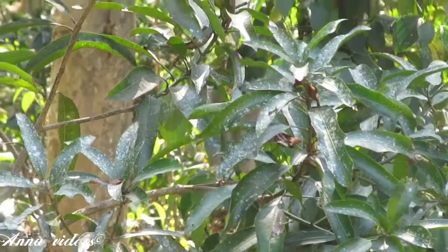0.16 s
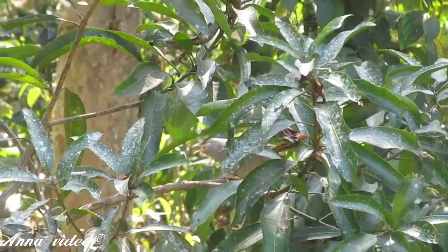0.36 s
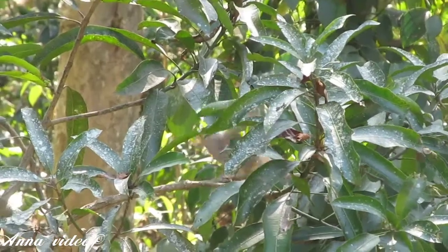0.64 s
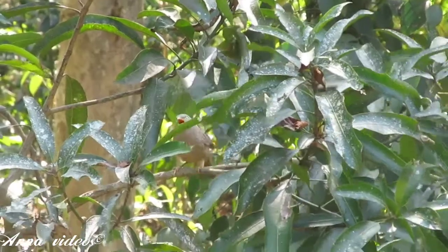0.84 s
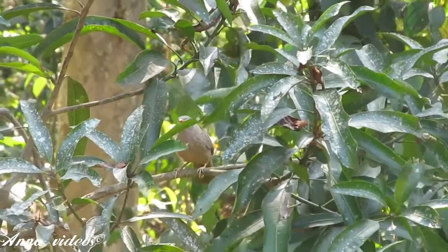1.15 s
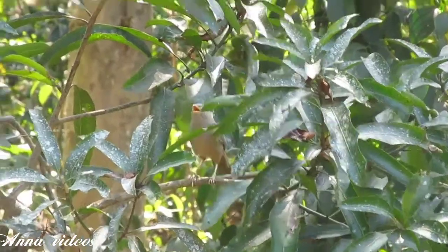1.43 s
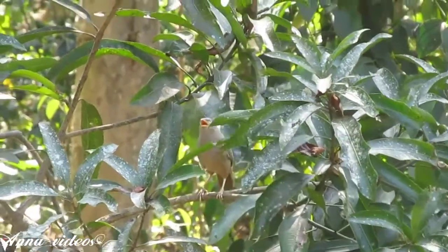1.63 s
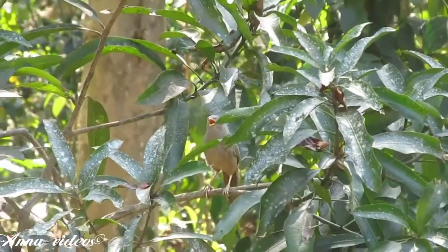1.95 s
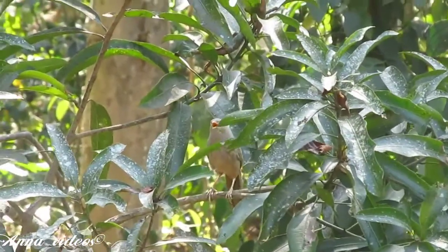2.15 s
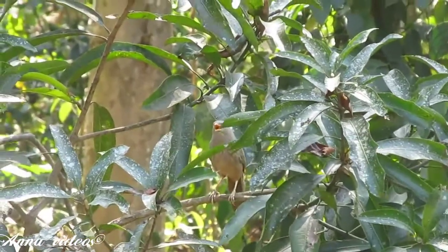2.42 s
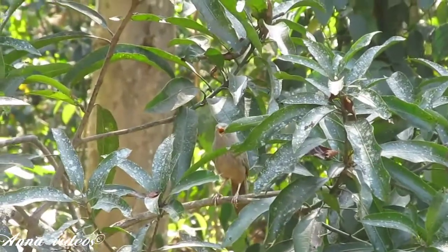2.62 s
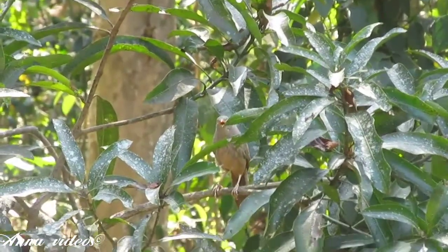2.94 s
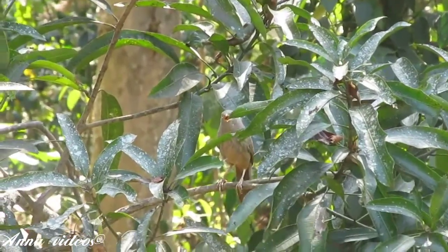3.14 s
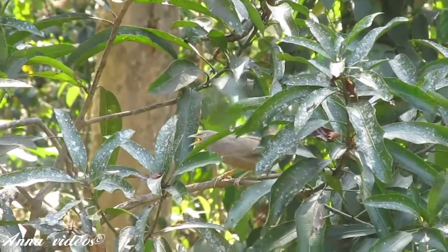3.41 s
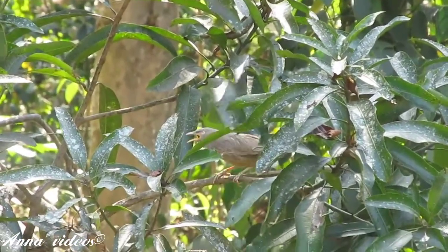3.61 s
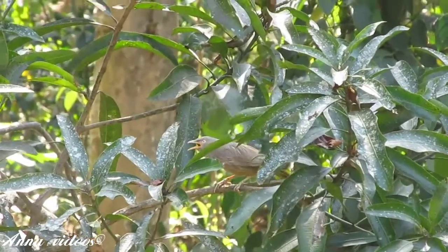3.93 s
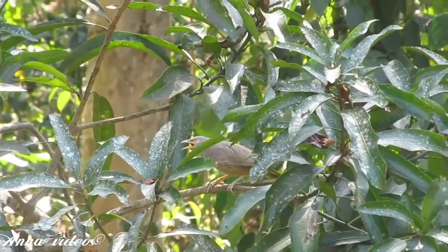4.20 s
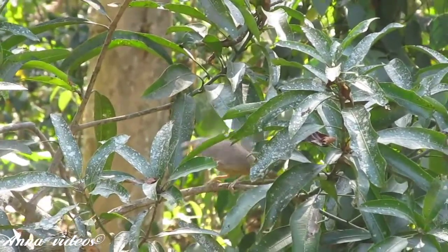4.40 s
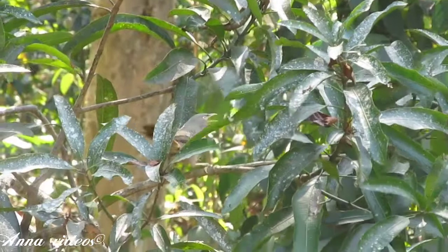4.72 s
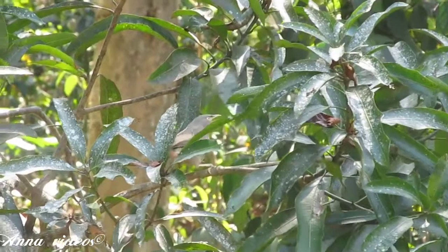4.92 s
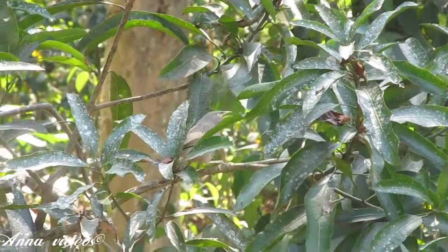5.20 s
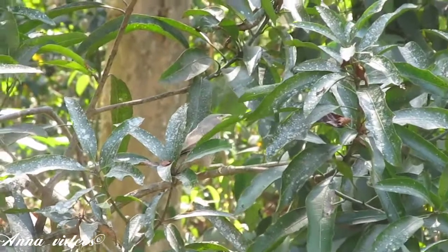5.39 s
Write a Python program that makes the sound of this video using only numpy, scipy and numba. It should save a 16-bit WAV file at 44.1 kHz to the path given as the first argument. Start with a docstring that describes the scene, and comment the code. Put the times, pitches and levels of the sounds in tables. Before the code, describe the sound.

Rapid ringing bird notes break into rasping chatter, squeaks and throbbing churrs among leafy trees, with distant traffic and a faint far crow at the end.

```python
"""Babbler in garden trees

Ringing notes swoop up, hold and break into a dying rasp, among short squeaks, throbbing churrs and harsh chatter.
Stacked partials make the voiced calls; uneven slaps ringing throat and beak cavities make the harsh ones.
Leaves and walls echo the bird and a far hoarse crow, over leaf hiss, traffic rumble and faint machine tones.
The camera changes its sample rate crudely, so every tone gets ghost tones around it."""
import sys
import numpy as np
from scipy import signal
from scipy.fft import rfft, irfft
from scipy.io import wavfile
from scipy.ndimage import uniform_filter1d
from numba import njit

SR = 44100
rng = np.random.default_rng(int(sys.argv[2]) if len(sys.argv) > 2 else 0)


def put_to_file(sound):
    """Save the sound as 16-bit audio at rate SR, in the file named by the first command-line argument."""
    columns = np.atleast_2d(sound).T  # one column per channel
    safe = np.clip(columns, -1, 1)
    whole_steps = np.round(safe * 32767)
    wavfile.write(sys.argv[1], SR, whole_steps.astype(np.int16))


def volts_from_decibels(level):
    """Turn decibel levels (scalar or array-like) into linear amplitude factors."""
    exponent = np.asarray(level, float) / 20
    return 10 ** exponent


N = 244755
T = np.arange(N) / SR

# Call levels below stand ahead of the bird's overall trim and the echoes.
# ringing notes: (start [s], length [s], aimed pitch [Hz], swoop time [s], sag by the end [Hz],
#                 held second partial [dB], first partial against it [dB])
NOTES = [(0.286, 0.12, 2489, .015, 219, -15.5, -1), (0.502, .043, 2120, .016, 410, -24.5, -5),
         (0.634, .134, 2323, .016, 80.4, -15.5, -1.5), (0.846, .073, 2341, 0.0097, 190, -12, -4.5),
         (1.334, .081, 2248, .007, 130, -13.5, -3.5), (3.445, .059, 2314, .014, 10.1, -10, -9),
         (3.612, .075, 2230, .020, 110, -16, -2.5), (3.778, .074, 2382, .018, 189, -12.5, -5.5),
         (4.517, 0.098, 2390, .011, 114, -12.5, -5), (4.698, .049, 2330, .011, 198, -20, 3.5)]
# flutter of each note's second partial, which also scales its pitch waver and breath: (flutter [dB])
NOTE_FLUTTER = [3.2, 2.5, 1, 1.3, 1.4, 2, 1.9, 1.3, 1.6, 2.2]
# brightness of each note, on its breath and its partials from the fourth up: (lift [dB])
NOTE_BRIGHTNESS = [-17, -6, -13, -1.5, 0, -12, -7, -11, -13, -4]
# growth of each note from start to end: (growth [dB])
NOTE_GROWTH = [-3, -3, 6, -4.5, -1, 1.5, -5.5, -2, 2, -4]
# low short squeaks: (start [s], length [s], aimed pitch [Hz], held second partial [dB])
SQUEAKS = [(1.008, .022, 1380, -30.5), (4.173, .025, 1340, -35), (4.296, .027, 1452, -31.5),
           (4.422, .028, 1462, -29)]
# throbbing half-voiced churrs: (start [s], length [s], aimed pitch [Hz], sag by the end [Hz],
#                                held second partial [dB], growth from start to end [dB])
CHURRS = [(2.644, .108, 1580, 170, -22, -10), (3.39, .055, 1580, -240, -26, 3)]
# third partial against the second, by its own frequency: (frequency [Hz], level [dB])
THIRD_PARTIAL = [(4000, -8.5), (4700, -4.5), (5300, -1.5), (5700, -9), (6200, -19), (6900, -17.5),
                 (7400, -22)]
# airway response for upper partials and, at a reduced share, breath: (frequency [Hz], gain [dB])
AIRWAY = [(800, -19), (2000, 12), (4000, -14), (5600, 0), (6600, -8), (7200, -20.5), (9000, -12.5),
          (11500, -23), (14000, -22)]
# long harsh rasps: (start [s], rise [s], fall [s], peak effort [dB], beak resonance [Hz])
RASPS = [(0.045, 0.13, .068, -25.5, 4100), (0.275, .016, .018, -22, 4370), (1.848, .1, .088, -23, 4300),
         (2.108, .06, .055, -26.5, 4150), (2.32, .07, .11, -22.5, 4080), (2.587, .055, .14, -23, 4201),
         (2.84, .055, .1, -25, 4050), (3.11, .105, .068, -23, 4010), (3.371, .07, .035, -18, 4260),
         (3.598, .022, .015, -25.5, 4850), (5.02, .03, .085, -44.5, 3900)]
# short harsh chips: (start [s], rise [s], fall [s], peak effort [dB], beak resonance [Hz])
CHIPS = [(1.01, .02, .05, -23.5, 4720), (1.13, .012, 0.047, -26, 4883), (1.235, .03, .042, -24, 4843),
         (1.508, .015, .05, -22, 4540), (1.633, 0.018, .03, -30.5, 4277), (1.78, .006, .034, -39, 4090),
         (3.945, .018, .04, -23.5, 4830), (4.055, .02, .04, -25.5, 4790), (4.183, .02, .032, -27, 4747),
         (4.301, .014, 0.051, -27, 4830), (4.428, .028, .032, -27, 4810), (4.845, .016, 0.04, -29, 4900)]
# effort curves of rasps, chips and note breaks: (start under peak [dB], end under peak [dB],
#                            power of the rise, power of the fall, throat share at the peak [dB])
RASP_SHAPE = (-14, -23.5, 2.5, 3.5, -5.5)
CHIP_SHAPE = (-13.5, -20.5, 2, 1.53, -5.5)
BREAK_SHAPE = (-3, -16, 2, 1, -10.5)
# throat cavities: (multiple of the beak resonance, width [Hz], relative level [dB])
THROAT_MODES = [(.4, 650, -2.5), (.48, 557, 1), (.62, 735, -3), (.75, 624, -4.5)]
# beak cavities: (multiple of the beak resonance, width [Hz], relative level [dB])
BEAK_MODES = [(1, 400, 0), (1.17, 800, -9), (1.33, 800, -7)]
# far crow's caw: (start [s], rise [s], fall [s], peak level [dB], centre [Hz])
CROW = (5.1, .07, .26, -39, 1828)
# effort curve of the caw: (start under peak [dB], end under peak [dB], power of the rise,
#                           power of the fall, throat share, not used here [dB])
CROW_SHAPE = (-17.5, -15, 2, 1.1, 0)
# spectrum of town and leaves, before scaling: (frequency [Hz], relative density [dB per Hz])
GARDEN = [(15, -39), (25, -21.5), (96, -1), (267, -2.5), (389, -5), (703, -10), (782, -9.5), (895, -8.5),
          (1050, -10), (1170, -9), (1450, -12), (4380, -16), (8130, -25.5), (9300, -30), (15500, -37)]
# traffic swell, applied relative to its mean: (time [s], level [dB])
TRAFFIC = [(0.0, -52), (1.41, -45), (2.26, -48.5), (2.49, -47), (3.15, -46), (3.54, -45.5), (4.65, -44.5),
           (5.01, -46), (5.55, -45.5)]
# machine tones: (frequency [Hz], level [dB])
HUMS = [(377, -54), (7865, -71)]
# tilt between the ports, shared out unequally to left and right: (frequency [Hz], tilt [dB])
PORT_TILT = [(60, 1.5), (110, -4.5), (200, -4), (380, -2), (700, -3), (1290, -1), (2380, -6.5),
             (4400, -1.5), (8120, -7), (15000, -2.5)]


def unit(x):
    """Scale to rms 1."""
    return x / np.sqrt(np.mean(x ** 2))


def on_log(hz, table):
    """Read a (frequency [Hz], level [dB]) table on a log-frequency axis."""
    table_hz, db = np.transpose(table)
    return np.interp(np.log(np.maximum(hz, 1)), np.log(table_hz), db)


def colour(x, table, share=1):
    """Filter by a share of the dB in a frequency table."""
    hz = np.arange(N // 2 + 1) * SR / N
    return irfft(rfft(x) * volts_from_decibels(share * on_log(hz, table)), N)


def band(x, lo_hz, hi_hz):
    """Steep band-pass at rms 1."""
    sos = signal.butter(5, [lo_hz, hi_hz], "band", fs=SR, output="sos")
    return unit(signal.sosfilt(sos, x))


def walk(rate):
    """Smooth chance that turns about rate times a second, spread 1."""
    k = max(int(SR / rate), 1)
    return unit(uniform_filter1d(uniform_filter1d(rng.standard_normal(N), k), k))


def track(tables, fade_s):
    """Join per-call tables into sample-rate columns and a gate that fades outside the calls."""
    s, *columns = np.transpose(np.concatenate(tables))
    edges = [(t[0][0] - fade_s, t[0][0], t[-1][0], t[-1][0] + fade_s) for t in tables]
    gate = np.interp(T, np.maximum.accumulate(np.ravel(edges)), np.tile([0, 1, 1, 0], len(tables)))
    return gate, [np.interp(T, np.maximum.accumulate(s), c) for c in columns]


@njit
def svf(x, hz, width):
    """State-variable band-pass with a moving centre, gain 1 there."""
    out, band_state, low_state = np.empty(len(x)), 0., 0.
    for i in range(len(x)):
        g, damping = np.tan(np.pi * hz[i] / SR), width / hz[i]
        v = (band_state + g * (x[i] - low_state)) / (1 + g * (g + damping))
        band_state = 2 * v - band_state
        low_state += 2 * g * v
        out[i] = damping * v
    return out


def arch(start_s, length_s, aim_hz, swoop_s, sag_hz, second_db, first_db, half_growth_db, swoop, third_db):
    """A voiced call as rows (time [s], pitch [Hz], three partials [dB]): it swoops to its aim, sags, lets go."""
    u = np.linspace(0, 1, num=24)
    # swoop: share of the aim by which the call starts low
    hz = aim_hz * (1 - swoop * np.exp(-u * length_s / swoop_s)) - sag_hz * u ** 3
    # starts 19 dB faint and grows over 1.55 swoop times
    attack_db = -19 * np.exp(-u * length_s / (1.55 * swoop_s))
    held_db = second_db + half_growth_db * (2 * u - 1)
    # effort lets go in the last few milliseconds
    release_db = -6.5 * np.exp((u - 1) * length_s / 0.0046)
    second = held_db + attack_db + release_db
    # the third partial starts less faint
    third = held_db + 0.51 * attack_db + third_db + on_log(3 * hz, THIRD_PARTIAL)
    return np.transpose([start_s + u * length_s, hz, second + first_db, second, third]).tolist()


def whistle(tables, fall_s, fall_to, fall_db, upper_db, waver, flutter_db, breath_db,
            throb=0., wander_db=1.5, waver_rate=400):
    """Syrinx in steady swing: a stack of partials; at the end the tension lets go and the pitch drops."""
    ended = []
    for table in tables:
        s, hz, first, second, third = table[-1]
        last = (s + fall_s, hz * fall_to, first + fall_db, second + fall_db, third + fall_db / 2)
        ended.append(list(table) + [last])
    gate, (hz, *partial_db) = track(ended, .002)
    # muscles round off every turn
    hz = uniform_filter1d(hz, int(.005 * SR))
    call_s = [t[1][0] for t in tables]
    flutter_db = np.interp(T, call_s, flutter_db * np.ones(len(tables)))
    upper_db = np.interp(T, call_s, upper_db * np.ones(len(tables)))
    # waver: pitch share per dB of flutter
    phase = 2 * np.pi * np.cumsum(hz * (1 + waver * flutter_db * walk(waver_rate))) / SR
    # air leaking past the membranes hisses more in rough, bright notes
    effort_db = np.maximum(partial_db[0], partial_db[1])
    hiss = colour(rng.standard_normal(N), AIRWAY, 0.54)
    breath = volts_from_decibels(effort_db + breath_db + upper_db + flutter_db) * hiss
    # higher partials follow the second one through the airway
    partial_db += [partial_db[1] + upper_db + on_log(k * hz, AIRWAY) for k in (4, 5, 6)]
    # the fundamental is steadier than the partials above it
    depth = [.4, 1, 1.5, 2, 2, 2]
    on, stack = gate > 0, np.zeros(N)
    for k, db in enumerate(partial_db):
        # each partial's level wanders on its own
        unsteady_db = depth[k] * (flutter_db * walk(460) + wander_db * walk(90))
        stack[on] += volts_from_decibels((db + unsteady_db)[on]) * np.sin((k + 1) * phase[on] + k)
    throb_hz = 135. * (1 + 0.14 * walk(37.9))
    beat = 1 + throb * np.sin(2 * np.pi * np.cumsum(throb_hz) / SR)
    return gate * beat * (np.sqrt(2) * stack + breath)


def burst(start_s, rise_s, fall_s, peak_db, hz, shape):
    """An unvoiced call as rows (time [s], effort [dB], centre [Hz], throat share [dB]): effort peaks and falls."""
    start_db, end_db, rise, fall, throat_db = shape
    u = np.linspace(0, 1, num=8)
    s = start_s + np.r_[rise_s * u, rise_s + fall_s * u[1:]]
    under_db = np.r_[start_db * (1 - u) ** rise, end_db * u[1:] ** fall]
    # weaker effort leaves a larger share to the throat
    return np.transpose([s, peak_db + under_db, hz + 0 * s, throat_db - 0.38 * under_db])


def chatter():
    """Rasps, chips and the broken ends of the notes, in time order."""
    breaks = []
    for s, length, _, _, _, db, _ in NOTES:
        # 5 ms after its note, louder after a louder one
        breaks.append((s + length + .005, .004, .04, -11.5 + .48 * db, 4600))
    calls = [burst(*row, RASP_SHAPE) for row in RASPS]
    calls += [burst(*row, CHIP_SHAPE) for row in CHIPS]
    calls += [burst(*row, BREAK_SHAPE) for row in breaks]
    return sorted(calls, key=lambda c: c[0, 0])


def cavities(slaps, beak_hz, modes):
    """Ring a set of resonances that scale with the beak, alternating in sign, at rms 1."""
    ringing = 0
    for k, (multiple, width, mode_db) in enumerate(modes):
        ringing = ringing + (-1) ** k * volts_from_decibels(mode_db) * svf(slaps, multiple * beak_hz, 1. * width)
    return unit(ringing)


def rasp():
    """Syrinx in chaos: slaps at uneven intervals ring the throat and beak cavities."""
    gate, (db, beak_hz, throat_db) = track(chatter(), 0.0079)
    turns = np.cumsum(beak_hz / 2 * volts_from_decibels(5 * walk(3000))) / SR
    # one slap at each whole turn, uneven in strength
    slaps = np.diff(np.floor(turns), prepend=0) * volts_from_decibels(2.5 * walk(5000) + 1.6 * walk(500))
    throat = cavities(slaps, beak_hz, THROAT_MODES)
    beak = cavities(slaps, beak_hz, BEAK_MODES)
    voice = beak + volts_from_decibels(throat_db) * throat
    # a wider beak lifts the resonance and lets more treble out
    gape = np.clip((beak_hz - 4300) / 500, 0, 1)
    passed = (1 - gape) * band(voice, 1420, 5950) + gape * band(voice, 1030, 6684)
    breath = volts_from_decibels(-19 + 1.5 * gape) * band(rng.standard_normal(N), 7100, 14200)
    return gate * volts_from_decibels(db) * (1.226 * passed + breath)


def crow():
    """A distant hoarse caw: breath blurred to a narrow band with a weaker one below."""
    gate, (db, hz, _) = track([burst(*CROW, CROW_SHAPE)], 0.057)
    breath = rng.standard_normal((2, N))
    caw = unit(svf(svf(breath[0], hz, 260.), hz, 260.))
    low = unit(svf(breath[1], 0.756 * hz, 249.0))
    return gate * volts_from_decibels(db) * (caw + volts_from_decibels(-6) * low)


def echoes(x):
    """Scatter from close leaves and, duller, from trees and walls further off, different at each port."""
    t = T[:SR]
    tails = 0
    # near, far: relative level [dB], time to die by 60 dB [s], treble limit [Hz]
    for db, t60, top_hz in ((-5, 0.14, 12000), (-12, 0.71, 5200)):
        tail = rng.standard_normal((2, SR)) * np.exp(-np.log(1000) * t / t60) * (t > .002)
        tail = tail / np.sqrt(np.sum(tail ** 2, axis=1, keepdims=True) * top_hz / 5000)
        lowpass = signal.butter(2, top_hz, fs=SR, output="sos")
        tails = tails + volts_from_decibels(db) * signal.sosfilt(lowpass, tail)
    # leaves stir, so the echo of a held note flickers
    stir = volts_from_decibels(2 * np.array([walk(150), walk(150)]) - 1)
    return x + 2 * stir * signal.fftconvolve(x[None], tails, axes=1)[:, :N]


def garden():
    """Leaf hiss and swelling traffic rumble from coloured noise, and machine tones from wavering sines."""
    mid = colour(rng.standard_normal(N), GARDEN)
    side = colour(rng.standard_normal(N), GARDEN)
    # the bed sits at -40 dB rms before the traffic swells
    bed = unit(mid + volts_from_decibels(-8.5) * side * np.array([[1], [-1]])) * volts_from_decibels(-40)
    swell_db = np.interp(T, *np.transpose(TRAFFIC))
    rumble = signal.sosfilt(signal.butter(1, 300, fs=SR, output="sos"), bed)
    bed = bed + rumble * (volts_from_decibels(swell_db - swell_db.mean()) - 1)
    hums = 0
    for hz, db in HUMS:
        phase = 2 * np.pi * np.cumsum(hz * (1 + 0.0059 * walk(20.4))) / SR
        hums = hums + np.sqrt(2) * volts_from_decibels(db + 2 * walk(19)) * np.sin(phase)
    return bed + hums


def scene():
    """The bird and the crow in their echoes, over the garden."""
    notes = [arch(*row, growth_db / 2, swoop=.3, third_db=0) for row, growth_db in zip(NOTES, NOTE_GROWTH)]
    squeaks = [arch(s, length, hz, .005, 70, db, -3, 0, swoop=.15, third_db=-8)
               for s, length, hz, db in SQUEAKS]
    churrs = [arch(s, length, hz, .012, sag_hz, db, -9, growth_db / 2, swoop=.1, third_db=7.5)
              for s, length, hz, sag_hz, db, growth_db in CHURRS]
    ringing = whistle(notes, fall_s=0.011, fall_to=.5, fall_db=-10, upper_db=np.array(NOTE_BRIGHTNESS),
                      waver=0.001388, flutter_db=np.array(NOTE_FLUTTER), breath_db=-19)
    squeaking = whistle(squeaks, fall_s=0.0145, fall_to=0.64, fall_db=-3, upper_db=-5,
                        waver=0.00298, flutter_db=1.78, breath_db=-16)
    churring = whistle(churrs, fall_s=0.012, fall_to=0.98, fall_db=-6, upper_db=-6, waver=.036,
                       flutter_db=1.6, breath_db=-1.48, throb=.4, wander_db=0.6, waver_rate=900)
    bird = volts_from_decibels(-0.5) * (ringing + squeaking + churring + rasp())
    return echoes(bird + crow()) + garden()


def crude_rate_change(ports):
    """Ghost tones: go up in rate by 160/147, then come back by picking samples without interpolation."""
    up, down = 160, 147
    camera = signal.resample_poly(ports, up, down, axis=1)
    # taking the sample at or before each instant errs in time as a sawtooth at the difference of the rates
    return camera[:, np.arange(N) * up // down]


def band_limit(x):
    """A steep low-pass at the top of the band."""
    return signal.sosfilt(signal.butter(12, 15930, fs=SR, output="sos"), x)


def record(dry):
    """Two ports of unequal colour, the left one sample late, through the crude rate change."""
    left = colour(dry[0], PORT_TILT, 0.92)
    right = colour(dry[1], PORT_TILT, -0.37)
    mix = crude_rate_change([np.roll(left, 1), right])
    return band_limit(mix)


dry = scene()
out = record(dry)
put_to_file(out)
```